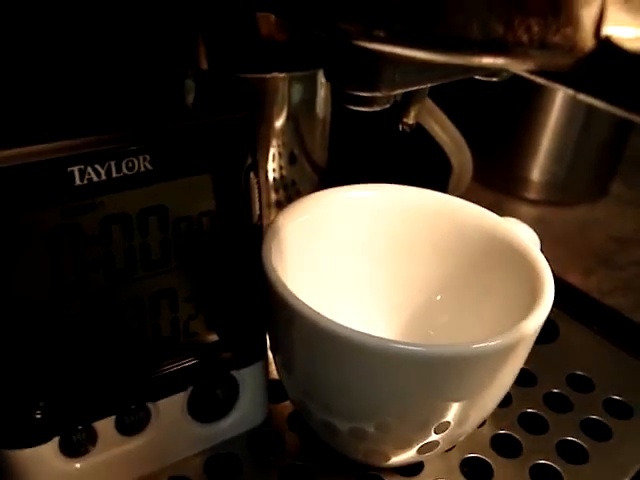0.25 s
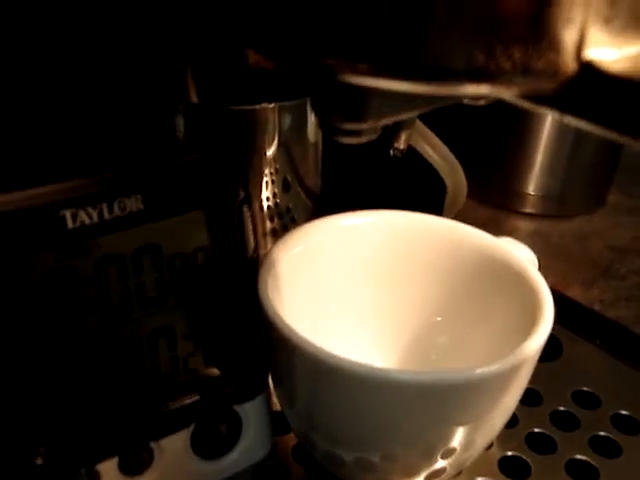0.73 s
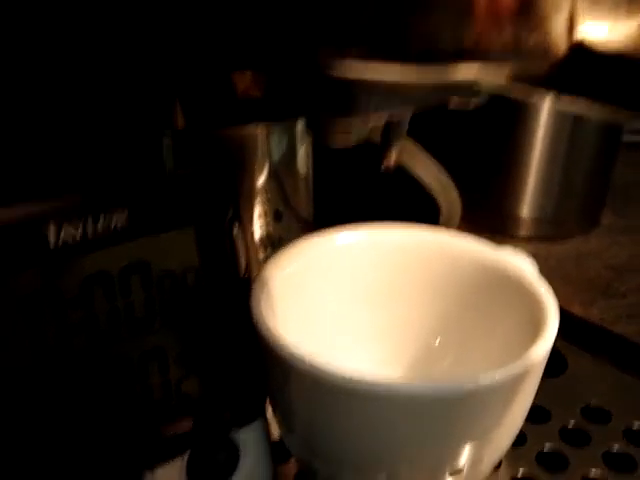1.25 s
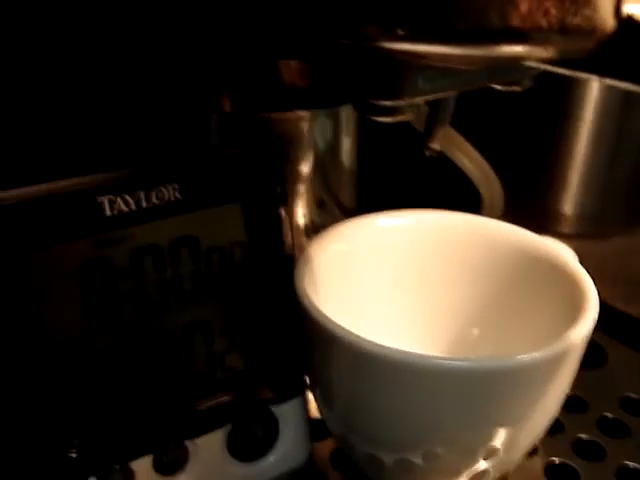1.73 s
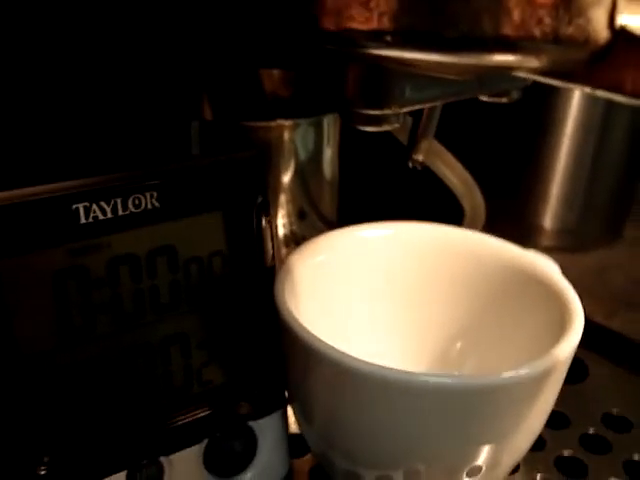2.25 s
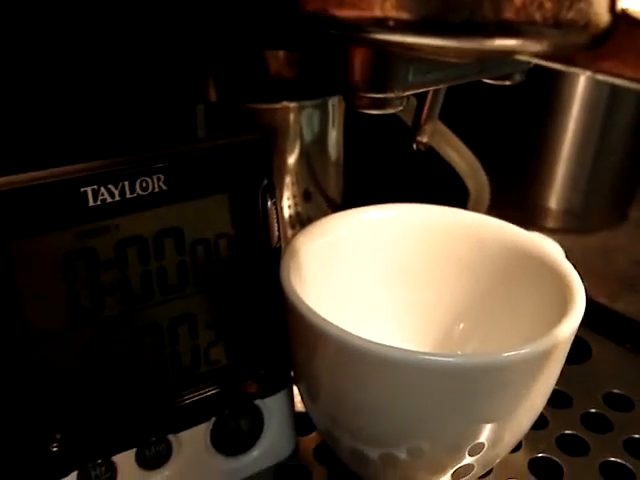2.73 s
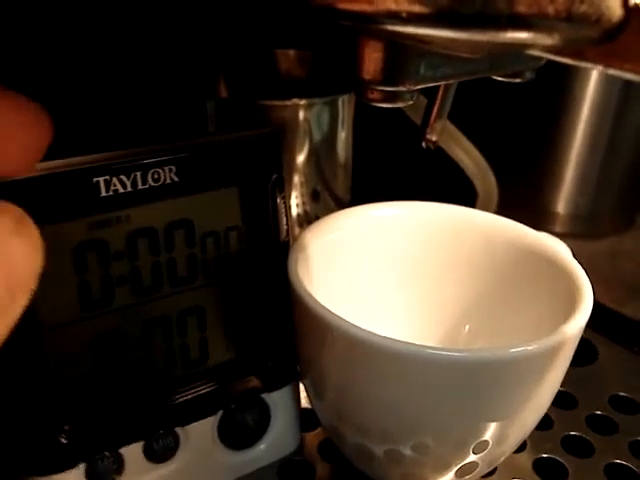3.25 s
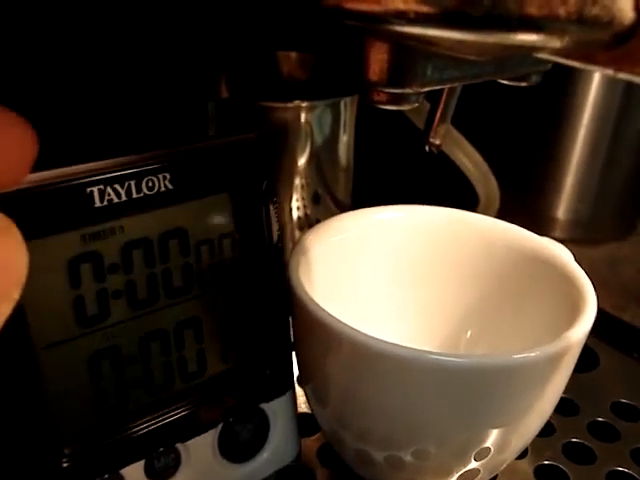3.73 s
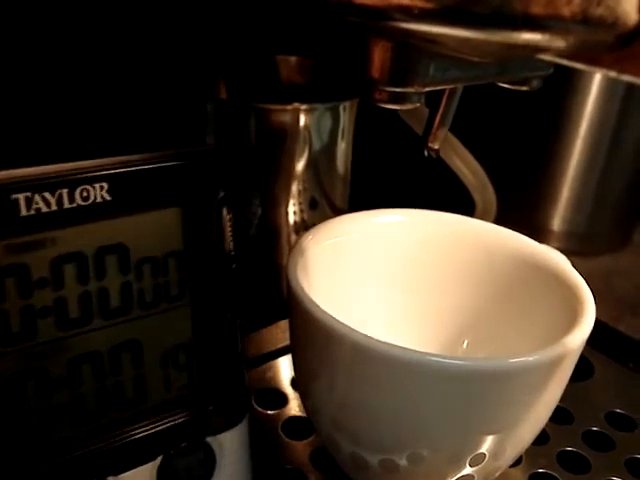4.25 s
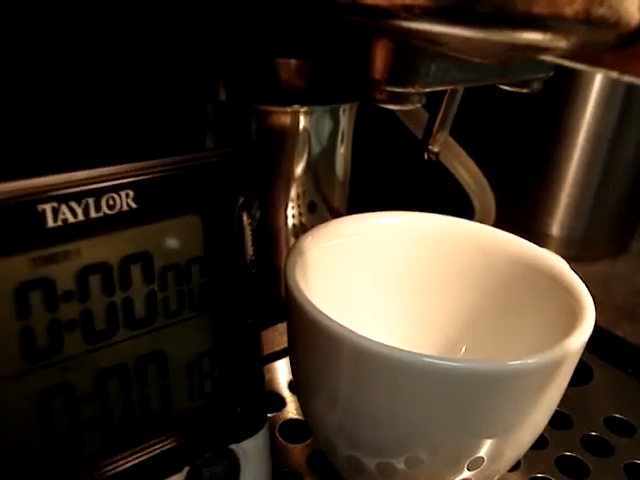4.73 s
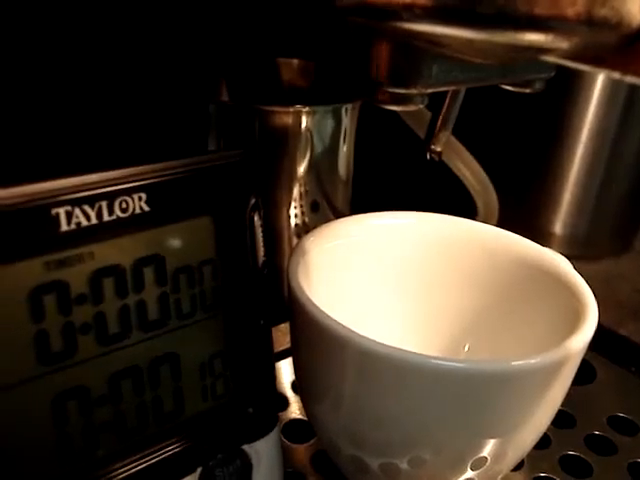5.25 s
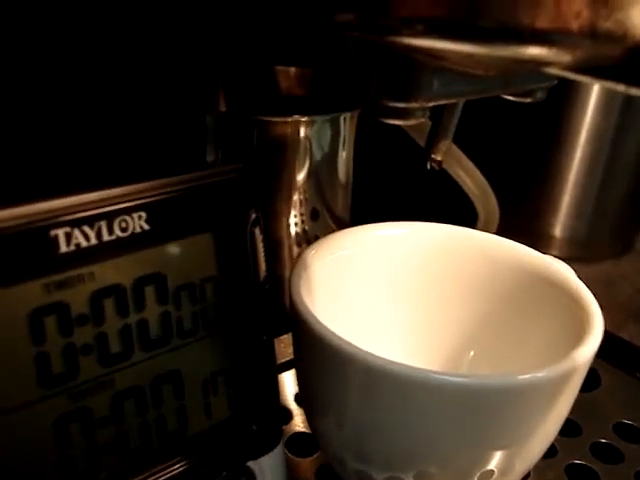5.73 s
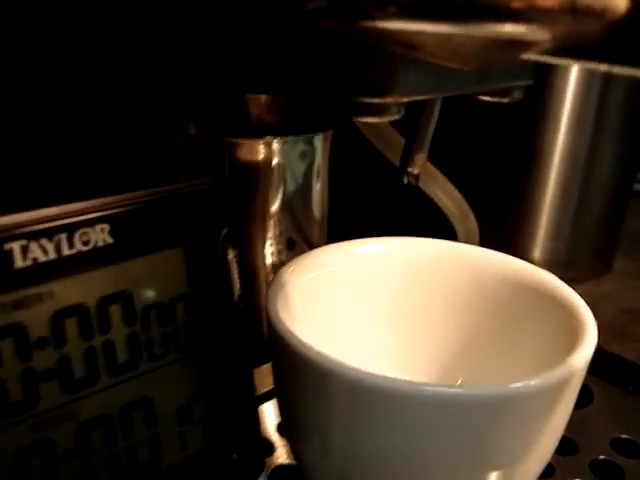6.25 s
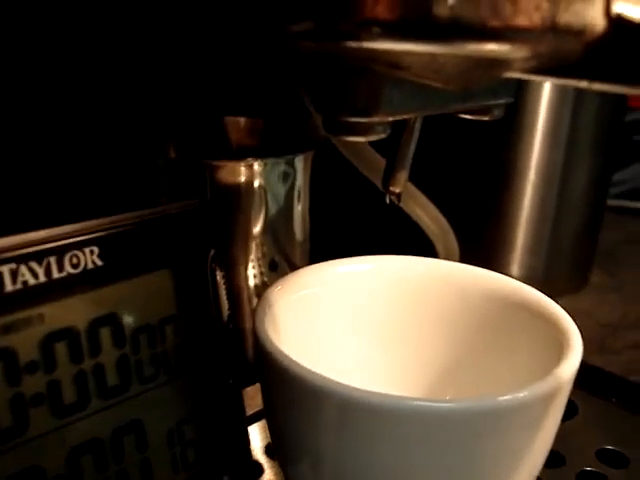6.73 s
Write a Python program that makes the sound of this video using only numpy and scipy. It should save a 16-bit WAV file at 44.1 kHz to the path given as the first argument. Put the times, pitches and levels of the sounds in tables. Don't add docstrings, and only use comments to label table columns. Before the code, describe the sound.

A home espresso machine's pump is already running, a hard, mains-rate buzz heard close on a small camera microphone. After a brief ragged start and a soft low thud, steel panels, drip tray, grille and cup rattle with a bright fizz. The pitch stays fixed while the tone shifts and strains; near the end the rattle calms and a cleaner buzz holds until the cut.

```python
import sys
import numpy as np
from scipy import signal
from scipy.fft import rfft, irfft, next_fast_len
from scipy.io import wavfile
from scipy.ndimage import uniform_filter1d, map_coordinates

SR = 44100
rng = np.random.default_rng(int(sys.argv[2]) if len(sys.argv) > 2 else 0)


def magnitude_from_level(level_db):
    exponent = np.asarray(level_db, float) / 20
    return 10 ** exponent


def transcribe(u):
    v = np.clip(np.atleast_2d(u).T, -1, 1)
    q = np.round(v * 32767).astype(np.int16)
    wavfile.write(sys.argv[1], SR, q)


N = 308259

MAINS_HZ = 60.02
TOP_HZ = 10120

# [t/s, stage: 0 filling, 1 rising, 2 straining, 3 holding]
PRESSURE = [
    (0, 0),
    (1.8, 0),
    (2.1, 1),
    (3.0, 1),
    (3.9, 2),
    (6.06, 2),
    (6.17, 3),
    (7, 3),
]
# [t/s, f/Hz, level/dB, t60/s]
VALVE = (.245, 150, -38, .15)
# [t/s, level/dB]
EFFORT = [(0.0, -8), (0.2, -7), (0.27, -7), (0.4, -7), (0.8, -0.4), (1.05, 0.5), (1.45, -0.5), (2.35, 1.5),
          (3.0, -0.4), (3.4, 2.5), (3.7, 1.2), (4.0, 1), (4.45, 1.2), (4.8, -1.1), (5.2, 1.5), (5.55, -0.2),
          (5.8, -0.1), (6.1, -0.2)]
# [f/Hz, width/Hz, slack level/dB, tight level/dB]
TRAY = [(2618, 83, 0.5, 1.5), (2863, 233, -2, -0.5), (3210, 134, -3, 1), (3442, 91, -2, 2),
        (3654, 230, -6.5, 0.5), (3980, 61, -4.5, -1.5), (4230, 95, -5, -0.5), (4690, 480, -5, -3.5),
        (5235, 390, -9, -5.5)]
# [f/Hz, width/Hz, level/dB]
SEATED = [(2710, 120, 3), (2876, 88, -0.5), (3480, 100, 0), (3720, 74, 0.5), (4020, 130, 1),
          (4460, 180, -1.5), (4950, 73, -5.5), (5290, 110, -16), (6030, 140, -9), (6740, 500, -14),
          (3150, 220, -6.5), (7550, 400, -16), (7870, 60, -13), (9000, 1300, -21)]


def unit(x):
    return x / np.sqrt(np.mean(np.abs(x) ** 2) + 1e-20)


def curves(rows, t):
    s, *cols = np.transpose(rows)
    return [np.interp(t, s, c) for c in cols]


def wobble(rate, t, count=1, order=3):
    knots = rng.standard_normal((count, int(N * rate / SR) + 6))
    return np.array([map_coordinates(k, [t * rate], order=order) for k in knots])


def filtered(x, response):
    m = next_fast_len(N + SR // 2)
    return irfft(rfft(x, m) * response(np.fft.rfftfreq(m, 1 / SR)), m)[..., :N]


def resonances(modes, f, tight):
    return np.array([magnitude_from_level(db[-tight]) * 1j * f * w / (c * c - f * f + 1j * f * w) for c, w, *db in modes])


def by_pressure(levels, t):
    return np.interp(curves(PRESSURE, t)[0], np.arange(len(levels)), levels)


def tightness(t):
    return np.clip((curves(PRESSURE, t)[0] - .5) / 1.5, 0, 1)


def air(t):
    return np.clip((VALVE[0] + .1 - t) / .1, 0, 1)


def play(t):
    # [t/s, level/dB]
    fizz_levels = [(0.0, -27), (0.02, -31), (0.23, -29), (0.27, -44.5), (0.29, -39), (0.82, -30.5),
                   (2.82, -30.5), (2.96, -33), (3.64, -29.5), (4.15, -34.5), (5.18, -33), (5.61, -39.5),
                   (5.66, -35), (5.96, -42.5), (5.99, -37.5), (6.21, -46.5), (6.25, -42.5), (6.99, -44.5)]
    usual_db = -30
    return curves(fizz_levels, t)[0] - usual_db


def pump():
    # [t/s, share of a cycle]
    slips = [
        (2.7, 0.0119),
        (3.22, -0.0114),
        (3.7, 0.0158),
        (4.02, -0.0124),
        (4.399, 0.007),
        (4.7, -0.0121),
        (5.6, 0.0079),
    ]
    slip_s = 0.025
    t = np.arange(int(N / SR * MAINS_HZ) + 3) / MAINS_HZ
    low = hum(t, drift_db=1.1, scatter=.07)
    high = knock(t, len(low) + 1, drift_db=1.9, dull_hz=5200)
    partials = np.vstack([low, high])
    multiple = np.arange(len(partials)) + 1
    late = sum(share * np.tanh((t - s) / slip_s) / 2 for s, share in slips)
    return strokes(partials * np.exp(-2j * np.pi * np.outer(multiple, late)))


def hum(t, drift_db, scatter):
    # [multiple, filling level/dB, rising level/dB, straining level/dB,
    # holding level/dB]
    overtones = [(1.0, -60.0, -62.5, -55.5, -55.0), (2.0, -72, -66, -56.0, -51),
                 (3.0, -49.0, -50.5, -59.5, -51), (4.0, -64, -50.5, -49.5, -48.5),
                 (5.0, -42, -41.5, -41.5, -39.5), (6.0, -44.5, -47, -50, -45), (7.0, -53, -48, -47, -47),
                 (8.0, -37.0, -33, -43.0, -35.5), (9.0, -41.5, -45.5, -34.5, -51),
                 (10.0, -37.5, -41.5, -39.5, -47), (11.0, -41, -43, -45.5, -43.5),
                 (12.0, -51.5, -50.0, -44.5, -46.5), (13.0, -55, -49, -46.5, -41.5),
            (14.0, -30, -36, -37.5, -52), (15.0, -33.5, -29.0, -22.5, -29.5),
            (16.0, -37.0, -31, -29.5, -34), (17.0, -50.5, -35, -33.5, -51),
            (18.0, -27.5, -30.0, -26.5, -30.5), (19.0, -37.0, -32.5, -30.5, -34.0),
            (20.0, -51, -47, -39.5, -52), (21.0, -34.5, -35.5, -35.5, -33.5),
            (22.0, -45.5, -40.5, -38.5, -40), (23.0, -41, -45.5, -43.5, -42.0),
            (24.0, -49, -43, -42.5, -48), (25.0, -37.5, -44, -35, -44.5), (26.0, -40, -42.5, -30, -38),
                 (27.0, -35.5, -35, -39, -38.5), (28.0, -50, -30.5, -31.5, -43.5),
             (29.0, -43.5, -26.5, -27.5, -29), (30.0, -42, -37, -42, -38), (31.0, -45.5, -51, -47.5, -48),
             (32.0, -48, -38.5, -35, -47), (33.0, -34.5, -34, -42, -35.0), (34.0, -36.5, -30.5, -30, -35),
             (35.0, -36.5, -38, -32, -34.5), (36.0, -35, -43, -41.5, -53), (37.0, -31.5, -39.5, -43, -45),
             (38.0, -40, -34.5, -37.5, -38.5), (39.0, -41.5, -49, -46, -51),
             (40.0, -34, -39.5, -40.5, -47.5), (41.0, -33.5, -40.0, -37.5, -48)]
    # [t/s, multiple, level/dB, half length/s]
    swells = [(0.0, 8, -14.5, 0.1), (0.05, 16, 15, 0.15), (0.15, 17, 21.5, 0.5), (1.8, 17, 21, 0.15),
              (2.0, 10, -10.5, 0.65), (3.35, 11, -9, 0.45), (3.517, 15, -4.5, 0.33), (4.1, 14, -15, 0.22),
              (4.1, 17, -4, 0.22), (4.2, 10, -12, 0.27), (4.85, 11, -16, 0.2), (4.9, 6, -14.0, 0.26),
              (5.3, 9, -13.5, 0.69), (5.3, 16, -4.5, 0.22), (5.5, 7, 8, 0.29), (5.503, 15, -9, 0.11),
              (5.75, 8, -16, 0.1),
              (0.75, 35, -5, 0.35), (0.9, 34, -9, 0.15), (1.6, 35, 6, 0.33), (1.8, 37, -7, 0.14),
                    (2.3, 19, -12, 0.26), (3.4, 18, -8.0, 0.32), (3.4, 19, 5, 0.57), (3.65, 29, -11, 0.27),
                    (3.65, 33, -13.0, 0.09), (3.7, 22, -6.5, 0.6), (3.75, 28, -13, 0.58),
                    (3.85, 34, -7, 0.1), (3.95, 32, -9.5, 0.35), (4.05, 38, -9.0, 0.23),
                    (4.65, 29, -8.5, 0.1), (4.85, 18, -10, 0.17), (4.9, 29, 6, 0.11), (4.95, 24, -15, 0.13),
                    (5.0, 21, -7.5, 0.32), (5.05, 34, -13, 0.1), (5.1, 35, -9.0, 0.077),
                    (5.3, 26, -5, 0.15), (5.4, 29, -6, 0.052), (5.4, 35, 7, 0.2),
              (0.65, 5, -7, 0.23), (1.2, 18, 2, 0.2), (3.3, 5, -5, 0.18), (4.1, 18, 4, 0.37),
                    (4.2, 2, -9, .5), (5.4, 4, -3, 0.3), (5.82, 15, 3.5, 0.1), (5.65, 30, 6, .3),
                    (6.8, 15, 3, 0.18), (5.26, 28, 4.5, .2), (6.3, 18, 4, .12), (6.9, 35, -12, .12),
                    (5.95, 35, -10, .15), (3.15, 29, 2.5, .15)]

    level = np.array([by_pressure(row[1:], t) for row in overtones])
    level += curves(EFFORT, t)[0]
    level += drift_db * wobble(2.29, t, count=len(level))
    for s, multiple, db, half in swells:
        level[round(multiple) - 1] += db * np.exp(-((t - s) / half) ** 2)
    phase = 2 * np.pi * rng.random((len(level), 1))
    phase = phase + 0.66 * wobble(1.474, t, count=len(level))
    unsteady = scatter + .35 * air(t)
    jitter = rng.standard_normal(level.shape) + 1j * rng.standard_normal(level.shape)
    return magnitude_from_level(level) * np.exp(1j * phase) * (1 + unsteady * jitter)


def knock(t, first, drift_db, dull_hz):
    # [filling level/dB, rising level/dB, straining level/dB, holding level/dB]
    stop_db = (-26.5, -27, -26.5, -30.5)
    order = np.arange(first, int(TOP_HZ / MAINS_HZ))[:, None]
    hz = order * MAINS_HZ
    slack, tight = (resonances(TRAY, hz, k).sum(0) / (1 + (hz / dull_hz) ** 8) for k in (0, 1))
    body = slack + tightness(t) * (tight - slack)
    seated = 1.34 * resonances(SEATED, hz, 0).sum(0) / (1 + (hz / 7600) ** 8)
    body = body + by_pressure((0, 0, 0, 1), t) * (seated - body)
    path_gain = magnitude_from_level(drift_db * wobble(1.15, t, count=len(hz)))
    path_phase = by_pressure((1.2, 1.3, 1.5, 2.6), t) * wobble(0.914, t, count=len(hz))
    paths = path_gain * np.exp(1j * path_phase)
    blow = body * paths * np.exp(-2j * np.pi * order * 0.0811)
    level_db = by_pressure(stop_db, t) + 0.55 * curves(EFFORT, t)[0] + 0.51 * play(t)
    return unit(blow) / np.sqrt(len(hz)) * magnitude_from_level(level_db)


def strokes(partials):
    size = 4096
    shapes = irfft(np.pad(partials, ((1, 0), (0, 0))), size, axis=0) * size / np.sqrt(2)
    cycle = np.arange(N) / SR * MAINS_HZ
    return map_coordinates(shapes, [cycle % 1 * size, cycle], order=1, mode="grid-wrap")


def rattle():
    # [f/Hz, width/Hz, slack level/dB, tight level/dB]
    panel_modes = [(152, 70, -20.5, -18.5), (319, 58, -14.5, -14.5), (508, 65, -14.5, -14),
                   (600, 230, -14, -16.5), (804, 85, -12.5, -13.5), (934, 132, -5.5, -6),
                   (1092, 54, -2.5, -3), (1272, 90, -6.5, -6), (1570, 140, -6, -8), (1719, 70, -1.5, -2),
                   (2030, 180, -2, -4.5), (2252, 78, -7, -7), (2453, 91, -3.5, -7.5)]
    grille_modes = [(5790, 420, -1.5, -5), (6120, 94, 1.5, -2.5), (6555, 360, -1, -4),
                    (7060, 100, -4.5, -3), (7670, 910, -5, -7.5), (8260, 81, -1, -3),
                    (8640, 600, -10.5, -11.5), (9160, 115, -2.5, -8), (9570, 680, -8.5, -12)]
    # [f/Hz, width/Hz, level/dB]
    cup_modes = [(4730, 200, -1.5), (6630, 670, -4.5)]
    # [filling level/dB, rising level/dB, straining level/dB, holding level/dB]
    panel_stages = (-24, -23.5, -21.5, -27.5)
    tray_stages = (-26, -26, -27, -35.5)
    grille_stages = (-30.5, -30.5, -30, -37)
    cup_stages = (-33, -32.5, -47, -56)

    t = np.arange(N) / SR
    shiver, own = wobble(18, t, count=2, order=1)
    sway = wobble(6, t, count=3)

    panel_db = by_pressure(panel_stages, t) + 0.6 * play(t) + 0.83 * air(t)
    panel_db = panel_db + 1.45 * shiver + 1.2 * sway[0]
    panels = magnitude_from_level(panel_db) * chatter(panel_modes, fall_db=-6.5, lumps_db=0.0, lag=0)

    tray_db = by_pressure(tray_stages, t) + 0.6 * play(t) + 0.59 * air(t)
    tray_db = tray_db + 0.71 * shiver + 0.51 * sway[1]
    tray = magnitude_from_level(tray_db) * chatter(TRAY, fall_db=-8.5, lumps_db=-1.0, lag=0.2)

    fizz_db = by_pressure(grille_stages, t) + play(t) + 1.7 * air(t)
    fizz_db = fizz_db + 0.59 * shiver + 0.76 * own + 0.91 * sway[2]
    grille = magnitude_from_level(fizz_db) * chatter(grille_modes, fall_db=-7.0, lumps_db=0.2, lag=0.35)

    cup_db = by_pressure(cup_stages, t) + 1.7 * play(t) - 8 * air(t) + 1.3 * own
    cup = magnitude_from_level(cup_db) * chatter(cup_modes, fall_db=-22.5, lumps_db=-1.0, lag=0)

    seated_gain = magnitude_from_level(-43.5 + .8 * shiver) * by_pressure((0, 0, 0, 1), t)
    seated = seated_gain * chatter(SEATED, fall_db=2, lumps_db=4.5, lag=0)
    return panels + tray + grille + cup + seated


def chatter(modes, fall_db, lumps_db, lag):
    t = np.arange(N) / SR
    share = tightness(t)
    since_stroke = (MAINS_HZ * t - lag * share - .05) % 1
    burst = uniform_filter1d(magnitude_from_level(fall_db * since_stroke), size=60)
    contacts = rng.standard_normal(N) * burst * magnitude_from_level(lumps_db * wobble(400, t, order=1)[0])
    grid_hz = np.arange(1, SR // 2, 5)
    colours = [np.sum(np.abs(resonances(modes, grid_hz, k)) ** 3, 0) ** (1 / 2) for k in (0, 1)]
    slack, tight = filtered(contacts, lambda f: np.array([np.interp(f, grid_hz, c) for c in colours]))
    return (1 - share) * unit(slack) + share * unit(tight)


def valve():
    s, hz, db, t60 = VALVE
    t = np.clip(np.arange(N) / SR - s, 0, None)
    return magnitude_from_level(db - 60 * t / t60) * (1 - np.exp(-t / 0.005)) * np.sin(2 * np.pi * hz * t)


def kitchen():
    # [f/Hz, level per Hz/dB]
    room_colour = [(15, -7), (40, -10), (90, -12.5), (300, -8.5), (900, -3.5), (2000, -8.5), (5000, -28.5),
                   (10000, -39)]
    f, db = np.transpose(room_colour)
    colour = lambda hz: magnitude_from_level(np.interp(np.log(hz + 1), np.log(f + 1), db))
    return magnitude_from_level(-47.5) * unit(filtered(rng.standard_normal(N), colour))


def scene():
    return (pump() + rattle() + valve() + kitchen())[None]


def starved(x, from_hz, odds, drop_db):
    hz, _, z = signal.stft(x, SR, nperseg=256)
    field = uniform_filter1d(rng.standard_normal(z.shape[1:]), size=5, axis=0)
    field = uniform_filter1d(field, size=5, axis=1)
    loud = uniform_filter1d(np.log(np.abs(z[0]) + 1e-9), size=5, axis=0)
    surge = loud - uniform_filter1d(loud, size=12, axis=1)
    field = unit(field) - .7 * unit(surge)
    reach = np.clip(hz / from_hz - 1, 0, .35)[:, None]
    holes = (unit(field) + reach > odds) & (reach > 0)
    return signal.istft(z * magnitude_from_level(drop_db * holes), SR, nperseg=256)[1][:, :N]


def low_pass(x):
    return signal.sosfilt(signal.butter(12, 10820, fs=SR, output="sos"), x)


def record(dry):
    heard = starved(dry, from_hz=4300, odds=1.5, drop_db=-22)
    heard = heard * np.clip((N - np.arange(N)) / (.002 * SR), 0, 1)
    mix = filtered(heard, lambda hz: hz < TOP_HZ)
    return low_pass(mix)


dry = scene()
out = record(dry)
transcribe(out)
```